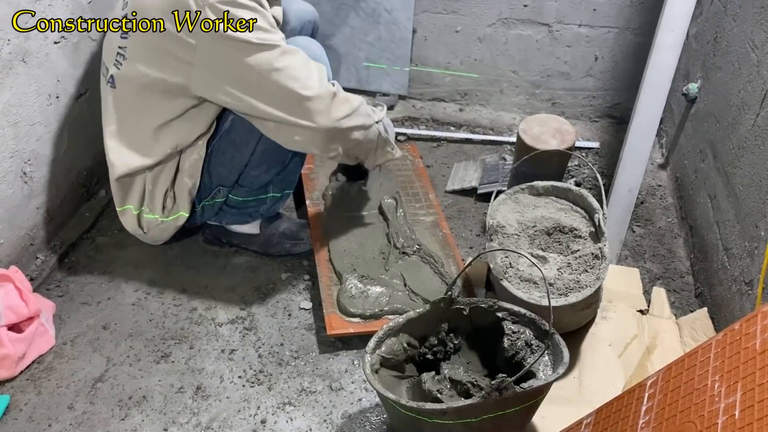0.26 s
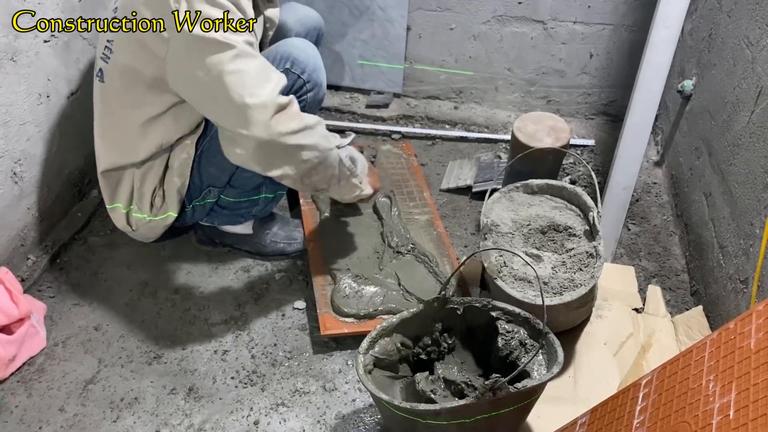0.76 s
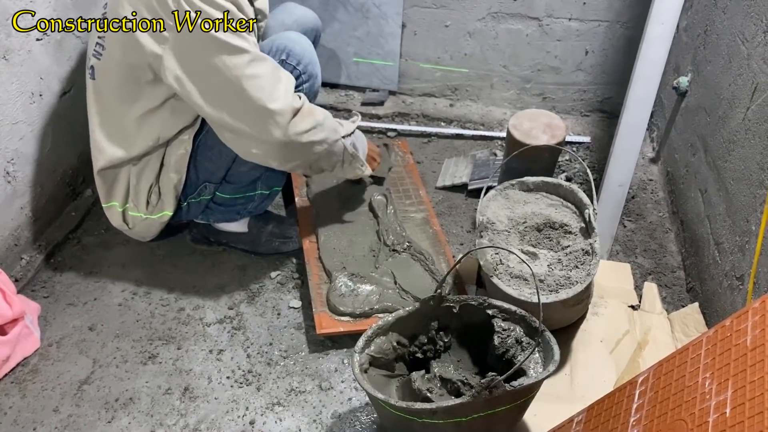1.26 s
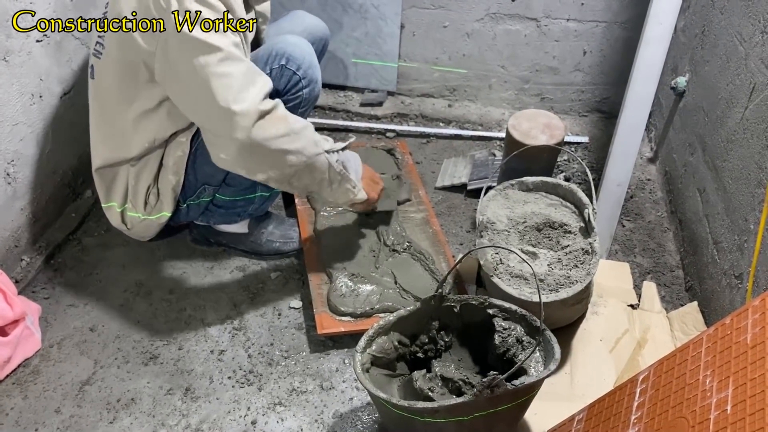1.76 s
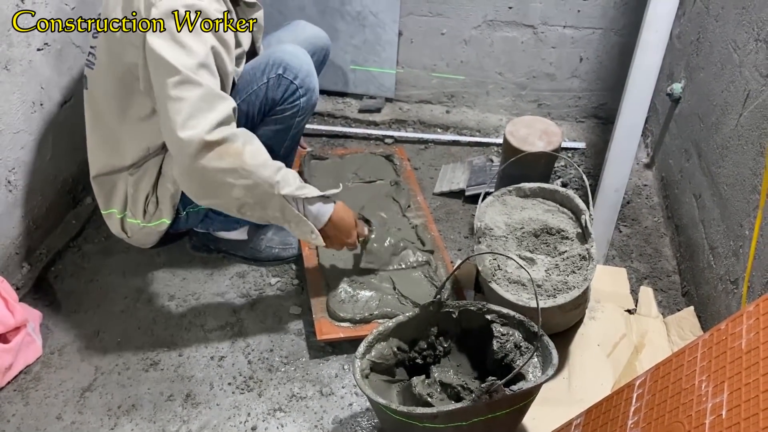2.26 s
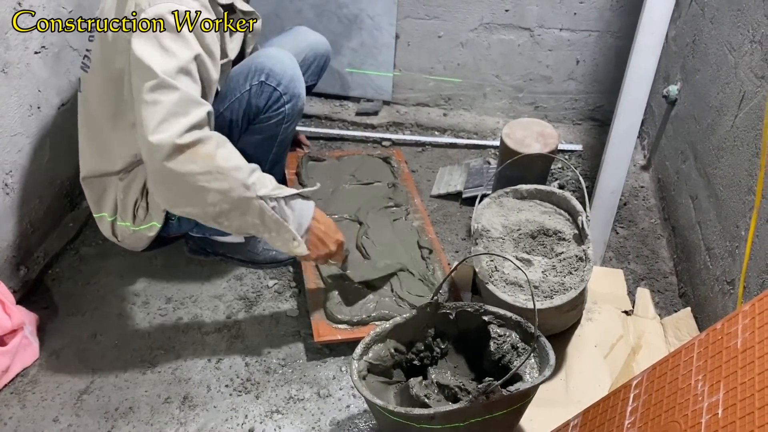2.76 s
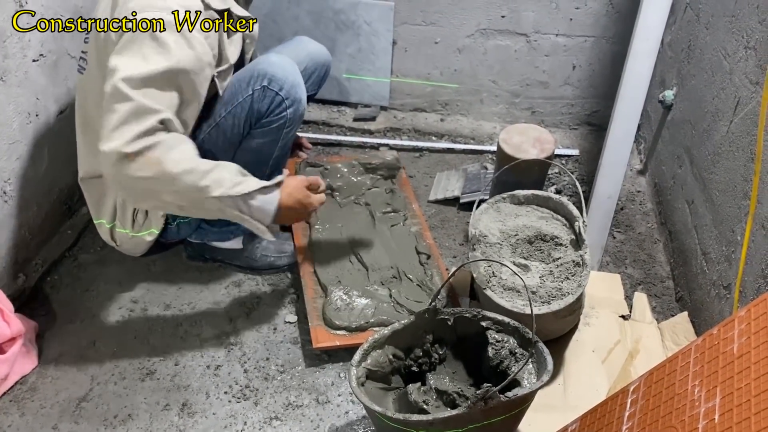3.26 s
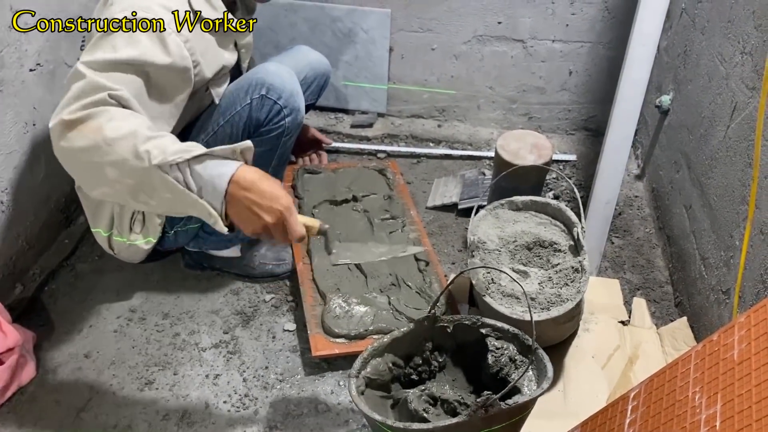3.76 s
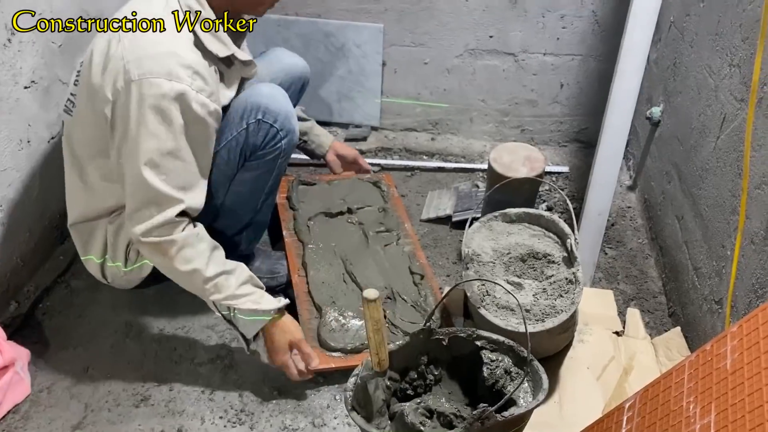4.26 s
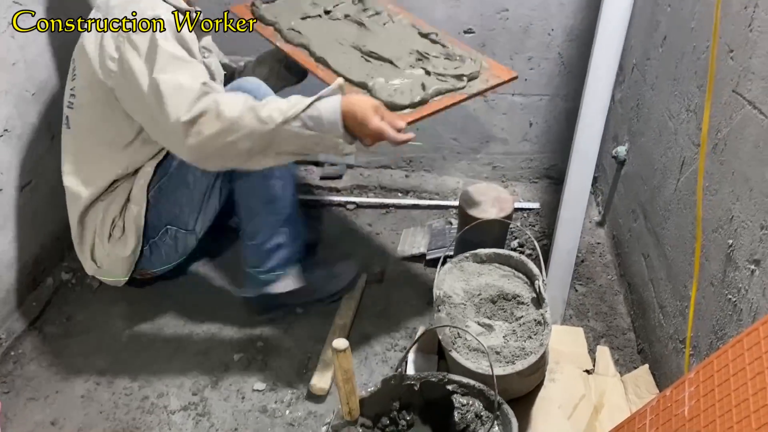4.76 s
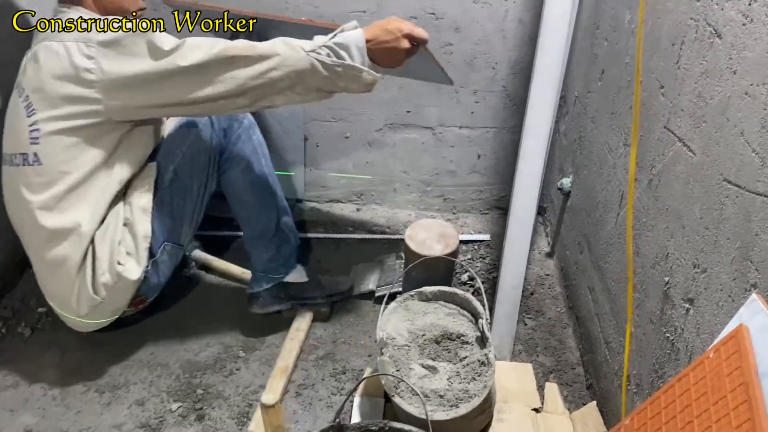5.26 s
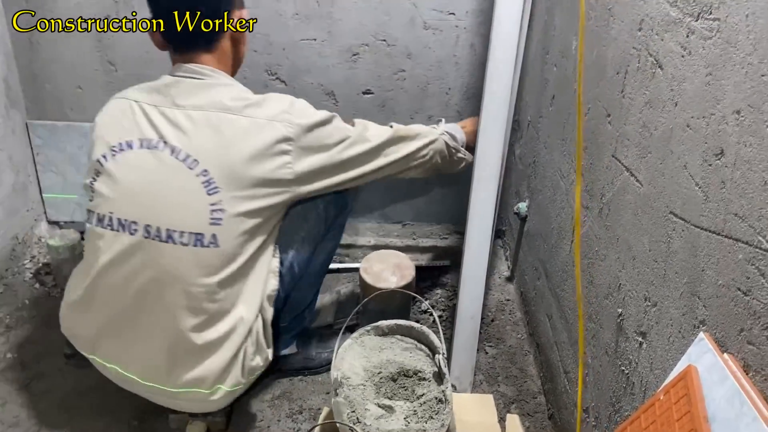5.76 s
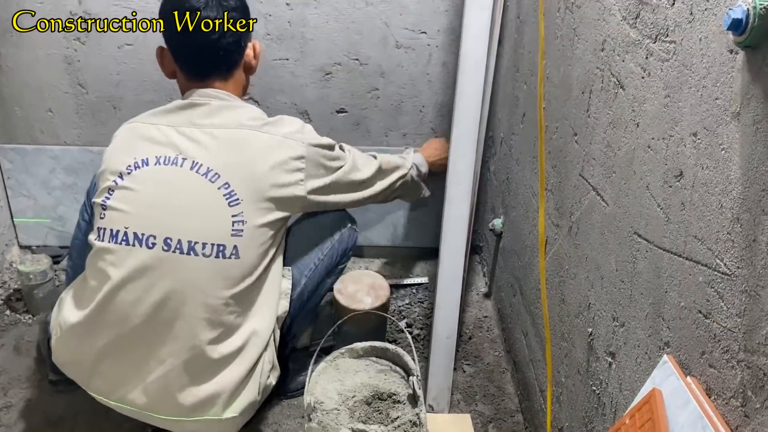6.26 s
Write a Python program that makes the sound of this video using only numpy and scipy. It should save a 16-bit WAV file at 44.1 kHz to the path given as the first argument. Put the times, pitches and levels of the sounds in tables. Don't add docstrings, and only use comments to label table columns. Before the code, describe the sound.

Quiet hissing strokes of steel in mortar, hoarse crowing outside, then loud hollow knocks and thuds as a clay tile is moved to the wall.

```python
import sys
import numpy as np
from scipy import signal
from scipy.fft import rfft, irfft, next_fast_len
from scipy.io import wavfile
from scipy.ndimage import uniform_filter1d, map_coordinates

SR = 44100
rng = np.random.default_rng(int(sys.argv[2]) if len(sys.argv) > 2 else 0)


def dump_mix(stems):
    frames = np.atleast_2d(stems).T
    limited = np.clip(frames, -1, 1)
    pcm = np.round(limited * 32767).astype(np.int16)
    wavfile.write(sys.argv[1], SR, pcm)


def boost_factor(decibels):
    exponent = np.asarray(decibels, float) / 20
    return 10 ** exponent


N = 286481
T = np.arange(N) / SR
GRID_S = .002
APART = np.array([[np.pi / 4], [-np.pi / 4]])


def unit(x):
    return x / np.sqrt(np.mean(x ** 2) + 1e-20)


def along(points, hz):
    f, v = np.transpose(points)
    return np.interp(np.log(hz + 1), np.log(f + 1), v)


def shape(spectrum):
    return lambda hz: boost_factor(along(spectrum, hz))


def hump(center_hz, width_hz, order):
    return lambda hz: 1 / (1 + ((hz - center_hz) / width_hz) ** order)


def filtered(x, response):
    m = next_fast_len(N + SR // 2)
    return irfft(rfft(x, m) * response(np.fft.rfftfreq(m, 1 / SR)), m)[..., :N]


def wobble(rate):
    at = np.cumsum(np.broadcast_to(rate, N))[::8] / SR
    knots = rng.standard_normal((2, 8192))
    return np.array([np.interp(T, T[::8], map_coordinates(k, [at], mode="wrap")) for k in knots])


def grains(response, spiky_db, rate):
    contacts = rng.standard_normal((2, N)) * boost_factor(spiky_db * wobble(rate))
    return unit(filtered(contacts, response))


def partial(phase, rough, flutter_hz):
    rough = np.clip(rough, 0, 1)
    clear = np.sin(phase + .6 * wobble(8) + APART)
    scattered = wobble(flutter_hz) * np.cos(phase) + wobble(flutter_hz) * np.sin(phase)
    return np.sqrt(2 - 2 * rough) * clear + np.sqrt(rough) * scattered


def swells(start, hold, fade, db, rise):
    t = np.arange(0, N / SR, GRID_S)[:, None]
    rising_db = -20 * np.maximum(start - t, 0) / rise
    fading_db = -20 * np.maximum(t - start - hold, 0) / fade
    return boost_factor(2 * (db + rising_db + fading_db)).T


def fine(v):
    return np.interp(T, np.arange(len(v)) * GRID_S, v)


def level(*event):
    return fine(np.sqrt(swells(*event).sum(0)))


# start, hold and fade in seconds, rumble in dB.
FEET = [(.17, 0.066, 0.32, -52), (2.54, 0.19, 0.43, -52.5), (0.87, 0.07, 0.89, -57),
        (1.55, 0.084, 0.2, -53), (2.046, 0.079, 0.74, -58), (3.35, .3, 0.22, -58.5),
        (3.145, 0.027, 0.18, -45.5), (3.701, 0.062, .2, -41), (3.823, 0.041, 0.51, -38.5),
        (4.157, 0.025, 0.33, -52.5), (4.401, 0.022, 0.28, -25), (4.464, .04, 0.34, -34),
        (4.587, 0.027, .1, -31), (4.657, .02, 0.11, -32.5), (4.708, 0.082, 0.36, -24.5),
        (4.926, 0.14, 0.39, -38.5), (5.151, 0.034, 0.19, -40.5), (5.418, 0.022, 0.3, -37),
        (5.511, 0.07, 0.24, -32), (5.565, 0.075, 0.43, -31.5), (5.83, 0.11, 0.33, -46),
        (6.365, 0.036, 0.2, -43)]
# start, hold and fade in seconds, level in dB.
GUSTS = [
    (.18, .05, 0.55, -70),
    (0.937, .05, 0.28, -55.5),
    (2.03, 0.074, 0.66, -57),
    (3.72, 0.072, 0.55, -69),
    (4.4, .4, .8, -67),
    (5.619, 0.048, 0.49, -35),
    (5.76, 0.3, 0.035, -43.5),
]
# frequency in Hz, density in dB per Hz.
AIR = [(12, -36), (20, -7), (85, 4), (268, -7), (553, -9.5), (889, -15), (2790, -17), (4360, -23.5),
       (10400, -36.5), (15700, -44)]
# frequency in Hz, density in dB per Hz.
RUMBLE = [(26, -40), (45, -11), (135, 5.5), (188, 3.5), (300, -5), (390, -23), (660, -120)]


def room():
    still_air_db, stirred_db, tread_s, gust_s = -62, -12.5, 0.048, .15
    weight = level(*np.transpose(FEET), tread_s)
    air = np.hypot(boost_factor(still_air_db), boost_factor(stirred_db) * weight)
    air = air * boost_factor(5.5) * grains(shape(AIR), spiky_db=3.0, rate=37)
    gust = np.hypot(level(*np.transpose(GUSTS), gust_s), boost_factor(-75.0))
    push = grains(lambda f: (f > 15) / (1 + (f / 45) ** 4), spiky_db=4.5, rate=2.7)
    rumble = weight * boost_factor(-4.5) * grains(shape(RUMBLE), spiky_db=2.5, rate=23)
    return air + gust * boost_factor(2.5) * push + rumble


# start in seconds, first and last pitch in Hz, level in dB, echo t60 in seconds.
PEEPS = [(0.0, 2353, 2120, -55, 0.28), (.06, 2400, 2140, -61, 0.22), (0.099, 3100, 3030, -54.5, 0.22),
         (0.144, 3030, 3020, -53, 0.18), (0.166, 2000, 2340, -56, 0.4), (0.212, 2580, 2560, -50, 0.23),
         (0.255, 2244, 1994, -54, 0.28), (0.27, 3050, 2300, -51.5, 0.62), (.295, 2520, 2570, -53, .15),
         (.3, 2750, 2880, -60, 0.28), (.3, 2297, 2154, -55, .3), (0.337, 2600, 2100, -56, 0.3),
         (1.497, 3450, 3250, -53, 0.46), (1.53, 3550, 3090, -57, .3), (1.591, 3050, 2800, -52, 0.6),
         (1.63, 3150, 2700, -53.5, .4), (2.496, 3604, 3296, -45, 0.44), (2.54, 3535, 3140, -52, 0.44),
         (2.651, 2750, 2420, -48, 0.53), (2.74, 2564, 2860, -51, 0.56), (2.801, 2790, 3130, -51, 0.84),
         (2.869, 2790, 3415, -44.5, 0.65), (6.394, 3350, 3232, -45, 0.26), (6.43, 3350, 3222, -48, 0.49)]


def chicks():
    peep_s, direct = 0.053, .45
    trill_hz, slur = 170, .2
    out, t = np.zeros((2, N + SR)), T[:SR // 2]
    for s, first_hz, last_hz, db, t60 in PEEPS:
        part = np.clip(t / peep_s, 0, 1)
        glide_hz = last_hz - first_hz
        shake = rng.standard_normal(len(t) // 60 + 1).repeat(60)[:len(t)]
        hz = first_hz + glide_hz * part + (trill_hz + slur * abs(glide_hz)) * shake
        phase = 2 * np.pi * np.cumsum(hz) / SR
        peep = np.sin(np.pi * part) ** 0.62 * (np.sin(phase) + boost_factor(-26) * np.sin(2 * phase + 1))
        echoes = rng.standard_normal((2, len(t))) * boost_factor(-60 * t / t60)
        echoes[:, 0] = direct * np.sqrt(t60 * SR / 14)
        heard = signal.fftconvolve(peep[None], echoes, axes=1)[:, :len(t)]
        out[:, round(s * SR):][:, :len(t)] += boost_factor(db) * heard / np.sqrt(np.mean(heard[:, :3500] ** 2))
    return out[:, :N]


def curves(tables):
    s, *cols = np.transpose(np.vstack(tables))
    gate = sum((T >= rows[0][0]) & (T <= rows[-1][0]) for rows in tables)
    gate = uniform_filter1d(np.clip(gate, 0, 1) * 1., size=400)
    return [np.interp(T, s, c) for c in cols] + [gate]


def crowing(tables, flutter_hz, fall_db, breath_db):
    hz, db, open_db, rough, calling = curves(tables)
    phase = 2 * np.pi * np.cumsum(hz) / SR

    def beak_db(f):
        return 10.0 * np.exp(-((f - 5900) / 500) ** 2) - 14.0 * np.exp(-((f - 4350) / 300) ** 2)

    third_db = db - 13 + 0.63 * open_db
    levels = [db, db - 9 + open_db, third_db]
    for k in range(4, 10):
        levels.append(third_db - fall_db * (k - 3) - 10.8 * rough + beak_db(k * hz))
    stack = 0
    for k, partial_db in enumerate(levels, 1):
        flutter = flutter_hz * (.45 + rough) * k ** .85
        stack = stack + boost_factor(partial_db) * partial(k * phase, rough * (0.87 + 0.15 * k), flutter)
    rasp = grains(hump(3150, 600, 6), spiky_db=1.5, rate=170)
    return calling * (stack + boost_factor(third_db + breath_db + 14.0 * rough) * rasp)


# start, hold and fade in seconds, level in dB, pitch in Hz.
CROAK = [(2.761, 0.034, 0.084, -55, 710), (2.845, 0.11, 0.29, -42, 632), (3.033, 0.015, 0.08, -33, 635.7),
         (3.13, 0.122, 0.26, -35.5, 661.8), (3.322, 0.029, 0.21, -45.5, 698.6),
         (3.496, 0.025, 0.098, -41, 642), (3.544, .035, .06, -39, 660), (3.61, 0.027, 0.063, -40.5, 645),
         (3.68, .02, 0.052, -46.5, 680)]
# time in seconds, pitch in Hz, effort in dB, beak opening in dB, roughness from 0 to 1.
CROW = [
    [(2.83, 747, -44, -5, 0.68), (2.9, 738, -41, 8.5, 0.88), (3.02, 738, -56, 12, 0.5),
     (3.04, 790, -28.5, -2.5, 0.37), (3.082, 813, -21.5, -8, 0.19), (3.135, 796.4, -34.5, 3, 0.9),
     (3.255, 841, -41, 19.5, 0.67), (3.36, 833, -51, 19, 0.61), (3.418, 810, -56, 10, 0.85),
     (3.5, 800, -40.5, 9, 0.68), (3.56, 806, -50.5, 15, 0.47), (3.7, 761, -57, 13, 0.42)],
]
# time in seconds, pitch in Hz, effort in dB, beak opening in dB, roughness from 0 to 1.
ANSWER = [
    [(2.83, 1064, -53, -7, 0.83), (2.87, 1086, -48, 5, .7), (2.93, 1070, -40.5, 5, 0.6),
     (2.98, 1020, -53, -4, 0.77)],
    [(3.41, 1034, -54, -5.5, 0.45), (3.44, 1012, -39, -12, 0.56), (3.468, 1094, -40, -4, 0.61),
     (3.5, 1034, -40, 7, 0.87), (3.545, 1017, -49.5, 3, 0.57)],
    [(3.555, 1023, -42, 7, 0.63), (3.575, 1047, -37, -1, .4), (3.62, 1045, -34.5, -6, 0.4),
     (3.64, 1051, -35.5, -3, 0.33), (3.668, 1016, -40, 0, 0.34), (3.69, 1005, -52, 2, 0.43)],
]


def fowl():
    *syllable, hz = np.transpose(CROAK)
    power = swells(*syllable, 0.028) + 1e-20
    total = power.sum(0)
    phase = 2 * np.pi * np.cumsum(fine(hz @ power / total)) / SR
    croak = (T < 3.71) * fine(np.sqrt(total)) * boost_factor(2.5) * partial(phase, 0.88, flutter_hz=172.8)
    crow = crowing(CROW, flutter_hz=70.6, fall_db=3.0, breath_db=-10.0)
    answer = crowing(ANSWER, flutter_hz=49.8, fall_db=3.5, breath_db=-4.5)
    return croak + crow + answer


# start in seconds, level in dB, pitch in Hz, t60 in seconds.
THUMPS = [(3.695, -39, 252, .08), (3.728, -39, 274, .08), (3.79, -44, 198, 0.066), (3.838, -34, 248, .1),
          (3.872, -34, 300, 0.064), (3.94, -37.5, 190, 0.11), (4.386, -18.5, 545, .12),
          (4.387, -28, 1230, .12), (4.46, -30, 483.5, .12), (4.625, -37, 580, 0.084),
          (4.712, -23, 279, 0.14), (4.713, -19, 540, 0.086), (4.8, -28, 295.4, .15), (4.733, -17, 559, 0.1),
          (4.79, -20.5, 515, 0.13), (4.86, -25.5, 530, .12), (5.548, -24, 418, 0.047),
          (5.592, -18.5, 220.3, 0.039), (5.6, -27.5, 190.2, .15), (5.655, -29, 180, .1),
          (5.617, -29, 300, .05), (6.36, -25, 950, 0.066), (6.378, -26.5, 857, 0.068),
          (6.396, -31, 870, 0.058)]


def thumps():
    out, t = np.zeros((2, N + SR)), T[:SR // 4]
    for s, db, hz, t60 in THUMPS:
        turn = rng.uniform(0, 2 * np.pi)
        note = np.sin(2 * np.pi * hz * t + turn + np.sign(np.cos(turn)) * APART)
        out[:, round(s * SR):][:, :len(t)] += boost_factor(db + 5 - 60 * t / t60) * (1 - np.exp(-t / 0.002)) * note
    return out[:, :N]


# start and fade in seconds, drumming in dB, drum pitch in Hz, left over right in dB.
JOLTS = [(2.5, .4, -50, 421, 0), (3.17, 0.1, -42.5, 475.2, -3), (3.724, .05, -30.5, 433, 1),
         (3.754, 0.095, -30, 442, -6.5), (3.775, .06, -32.5, 441.4, 3), (3.83, 0.095, -34.5, 410, 8),
         (3.866, 0.069, -30, 432.6, -3), (3.89, 0.11, -33, 455, 2), (3.93, 0.27, -39, 376, 2),
         (3.985, 0.087, -38, 405, 5), (4.01, 0.032, -38, 402.3, -4), (4.386, 0.1, -10, 376.6, 10),
         (4.405, 0.081, -13, 385, 0), (4.457, .1, -16.5, 390.7, 1), (4.505, 0.073, -20, 386, 3),
         (4.582, 0.095, -22, 380, 4), (4.606, 0.071, -18.5, 392.1, 1), (4.642, .04, -33, 390, -1),
         (4.662, 0.071, -22.5, 377.8, 6.5), (4.711, 0.12, -14.5, 453.3, -2.5),
         (4.754, 0.18, -17.5, 426.8, 2.5), (4.829, 0.124, -21, 415, -3), (4.93, .12, -35.5, 354.4, -12),
         (5.03, .08, -41.5, 341, -6), (5.15, 0.13, -45, 361, -3), (5.49, 0.39, -35, 336.3, -0.5),
         (5.594, 0.073, -30.5, 324.7, 0), (5.67, 0.2, -44.5, 340, -3), (6.36, 0.047, -24.5, 399.4, -4.5),
         (6.378, 0.048, -27.5, 396, -1), (6.405, 0.049, -30, 372.5, -2), (6.468, 0.039, -38.5, 368, -3)]


def tile():
    s, fade, db, hz, pan_db = np.transpose(JOLTS)
    still_db, still_hz = -61, 421.2
    power, still = swells(s, .012, fade, db, .008), boost_factor(2 * still_db)
    total = power.sum(0) + still
    drum_hz = fine((hz @ power + still_hz * still) / total)
    note = partial(2 * np.pi * np.cumsum(drum_hz) / SR, .4, flutter_hz=90)
    thud = grains(hump(400, 150, 4), spiky_db=3.5, rate=42)
    side = boost_factor(np.outer([.5, -.5], fine(pan_db @ power / total)) - 2.0)
    return fine(np.sqrt(total)) * side * (fine(1 - still / total) * note + boost_factor(-3) * thud)


# start in seconds, peak in dB, treble in dB, t60 in seconds, hollow boom in dB.
KNOCKS = [
    (2.168, -34, -29, 0.47, -62),
    (4.382, -10.5, -14.5, 0.63, -8.5),
    (4.457, -23.5, -15, 0.56, -1),
    (4.707, -6.5, -19, 0.66, -9),
    (5.144, -26.5, -9.5, 0.72, -4),
    (6.356, -17, -25.5, 0.28, 4),
]
# frequency in Hz, density in dB per Hz.
BLOW = [(290, -33.5), (500, 15.5), (749, -17.5), (841, -20.5), (1170, -11.5), (1810, -20.5), (3170, -19.5),
        (4230, -29.5), (9500, -33.5), (15700, -47.5)]
# frequency in Hz, share of the t60.
DAMPING = [(600, 1.075), (3000, 0.77), (6000, 0.62), (14000, 0.61)]


def knocks():
    out = np.zeros((2, N + SR))
    pan = boost_factor(0.8 * np.array([[.5], [-.5]]))
    for s, db, treble_db, t60, hollow_db in KNOCKS:
        hz, t, z = signal.stft(rng.standard_normal((2, SR)), SR, nperseg=128)
        tilt = np.clip(np.log2(hz / 1500 + 1e-9) / 1.9, 0, 1)
        colour_db = along(BLOW, hz) + (treble_db + 13.5) * tilt
        colour_db += hollow_db * np.exp(-((hz - 880) / 300) ** 2)
        colour_db += 7.7 * np.exp(-((hz - 5700) / 800) ** 2)
        fading_db = -60 * t / (t60 * along(DAMPING, hz)[:, None])
        direct = boost_factor(-60 * t / 0.045)
        z = z * boost_factor(colour_db)[:, None] * (boost_factor(fading_db) + 1.48 * direct)
        burst = signal.istft(z, SR, nperseg=128)[1][:, :SR]
        rise_s = .014 * t60
        burst = burst / np.sqrt(np.mean(burst[:, :900] ** 2)) * (1 - np.exp(-(T[:SR] / rise_s) ** 2))
        out[:, round((s - .75 * rise_s) * SR):][:, :SR] += boost_factor(db - 6.0) * pan * burst
    return out[:, :N]


# start in seconds, peak in dB.
TICKS = [
    (0.4918, -55),
    (0.6647, -53),
    (1.038, -72),
    (1.494, -56),
    (2.6374, -54),
]


def ticks():
    out, t = np.zeros((2, N)), T[:900]
    for s, db in TICKS:
        out[:, round(s * SR):][:, :900] += boost_factor(db + 3.5 - 60 * t / 0.06) * rng.standard_normal((2, 900))
    return filtered(out, lambda hz: hz / (hz + 2500))


# frequency in Hz, width in Hz, level in dB.
BLADE = [(965, 34, 3.5), (1950, 43, -1.5), (2400, 98, -16), (3350, 33, 4.5), (3514, 36, -2),
         (4950, 70, -8.5), (6050, 60, -14), (7300, 78, -20)]
# start, hold and fade in seconds, level in dB.
RATTLE = [
    (4.998, 0.0049, 0.043, -40),
    (5.412, 0.014, .05, -54),
    (5.482, 0.065, 0.039, -41.5),
    (5.588, 0.026, 0.11, -43.5),
]


def blade():
    def modes(f):
        total = 0
        for k, (c, w, db) in enumerate(BLADE):
            total = total + (-1) ** k * boost_factor(db) * 1j * f * w / (c * c - f * f + 1j * f * w)
        return total

    return level(*np.transpose(RATTLE), 0.0079) * boost_factor(4.5) * grains(modes, spiky_db=-0.5, rate=81)


# start, hold and
# fade in seconds, grit in dB, drag in dB.
STROKES = [(0.0, 0.031, 0.03, -58, -52.5), (0.194, 0.016, 0.14, -57.5, -53.5),
           (0.555, 0.014, 0.13, -58.5, -51.5), (0.63, 0.47, 0.22, -70, -77), (0.84, 0.039, 0.15, -59.5, -60),
           (1.157, 0.035, 0.046, -52, -52.5), (1.274, 0.16, 0.51, -64.5, -59.5),
           (1.519, .04, 0.17, -60.5, -55), (1.603, 0.027, 0.11, -54.5, -53),
           (1.786, 0.033, 0.06, -50.5, -56), (1.891, 0.027, 0.056, -58, -67),
           (1.963, 0.021, 0.075, -81, -84),
           (2.182, 0.05, 0.15, -64, -43.5), (2.269, 0.012, 0.037, -55, -62),
          (2.42, 0.18, 0.15, -62.5, -46.5), (2.84, 0.07, 0.28, -53.5, -42.5),
          (3.032, 0.056, 0.15, -49.5, -41.5), (3.134, 0.077, 0.22, -44.5, -37.5),
          (3.466, 0.072, 0.13, -55.5, -40), (3.56, 0.09, .1, -60, -58), (3.68, 0.014, 0.03, -51.5, -42.5),
          (3.724, 0.046, 0.084, -60.5, -40), (3.825, 0.034, 0.087, -63, -41.5),
          (3.88, 0.038, 0.1, -68, -46), (3.905, 0.025, 0.21, -53.5, -48.5), (4.11, 0.02, 0.16, -51, -43),
          (4.3, 0.11, 0.11, -55.5, -59.5), (4.99, 0.022, 0.088, -53.5, -63),
          (5.105, 0.039, 0.068, -51.5, -55), (5.15, 0.018, 0.048, -42, -36.5),
          (5.356, 0.078, 0.14, -54.5, -54.5), (5.45, 0.076, 0.097, -44, -40),
          (5.53, 0.024, 0.082, -55, -41), (5.6, 0.05, 0.089, -48.5, -37.5), (5.65, 0.012, 0.18, -40.5, -36),
          (5.967, 0.063, 0.39, -55, -51), (6.27, 0.098, 0.13, -56.5, -51), (6.399, 0.033, .2, -59, -57)]
# start in seconds, level in dB.
SLAPS = [
    (.19, -56),
    (.86, -54.5),
    (1.17, -51),
    (1.6, -56.5),
    (1.79, -53),
]
# frequency in Hz, density in dB per Hz.
GRIT = [(180, -36), (300, -8), (811, -9.5), (1010, -12.5), (1600, -23.5), (2900, -9.5), (3430, -9),
        (3850, -10), (10800, -19.5), (15700, -27.5)]
# frequency in Hz, density in dB per Hz.
DRAG = [(290, -71), (500, -10), (665, -13), (852, -10), (1140, -6.5), (2060, -10), (2980, -18.5),
        (4500, -35), (5850, -24), (9900, -120)]


def trowel():
    start, hold, fade, grit_db, drag_db = np.transpose(np.array(STROKES))
    touch_s, rest_db = 0.029, -68.5
    rub = np.hypot(level(start, hold, fade, grit_db + 4.5, touch_s), boost_factor(rest_db))
    grit = rub * grains(shape(GRIT), spiky_db=2.0, rate=780)
    pull = level(start, hold, 1.42 * fade, drag_db + 1.0, touch_s)
    drag = pull * grains(shape(DRAG), spiky_db=3.0, rate=41)
    s, db = np.transpose(SLAPS)
    slap = level(s, .035, 0.065, db, touch_s)
    heap = slap * boost_factor(0.5) * grains(hump(620, 200, 4), spiky_db=5.0, rate=82)
    return grit + drag + heap


def scene():
    return room() + chicks() + fowl() + thumps() + tile() + knocks() + ticks() + blade() + trowel()


def roll_off(x):
    return signal.sosfilt(signal.butter(12, 15890, fs=SR, output="sos"), x)


def record(dry):
    held = dry / (1 + np.abs(dry / .85) ** 4) ** (1 / 4)
    mix = filtered(held, lambda hz: hz < 15850)
    return roll_off(mix)


dry = scene()
out = record(dry)
dump_mix(out)
```